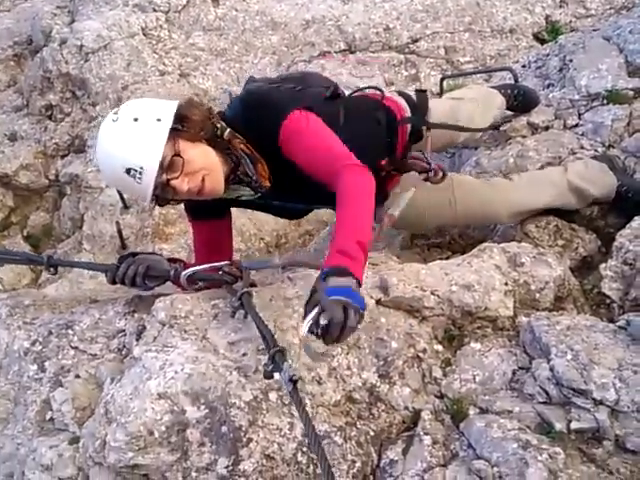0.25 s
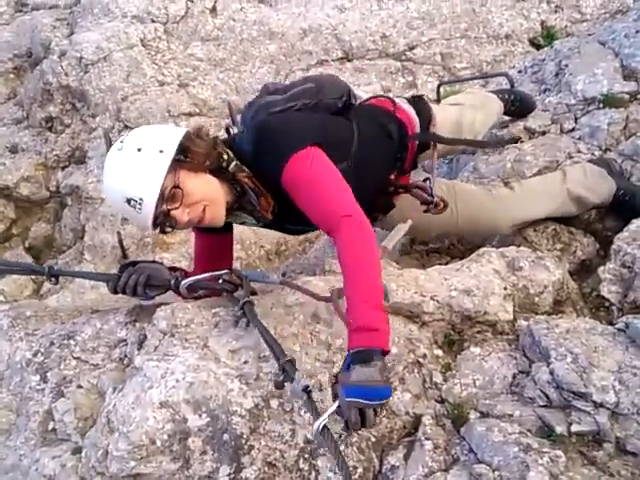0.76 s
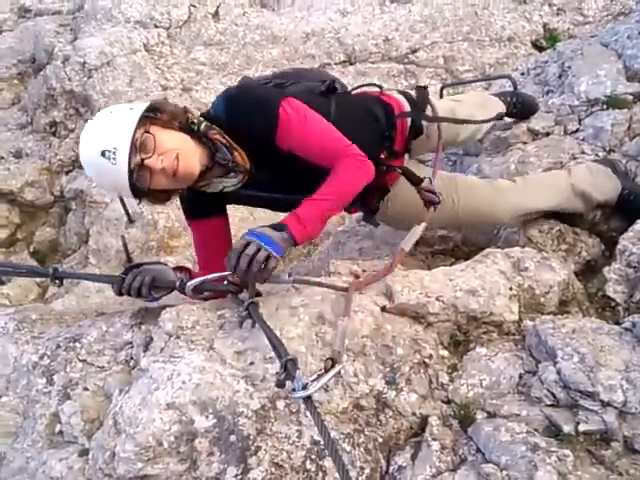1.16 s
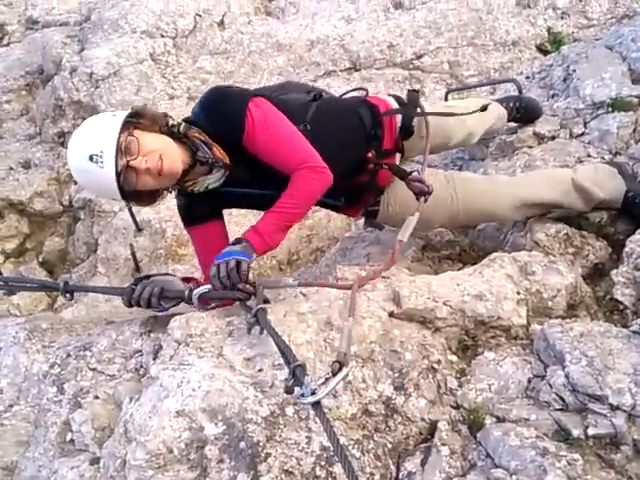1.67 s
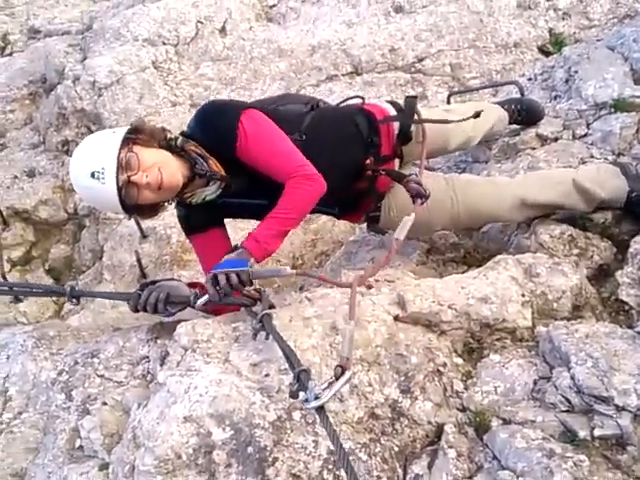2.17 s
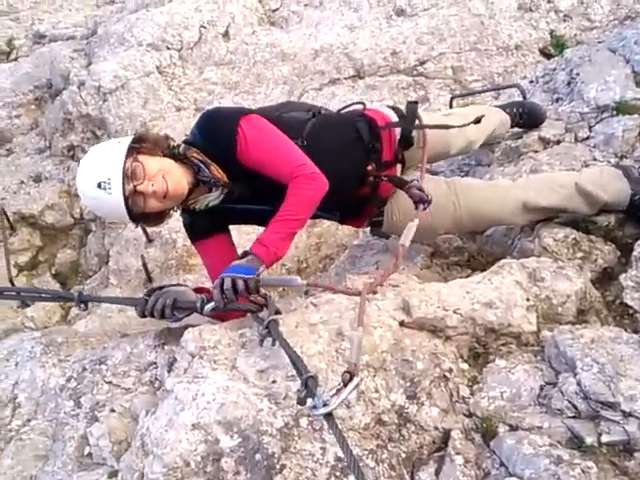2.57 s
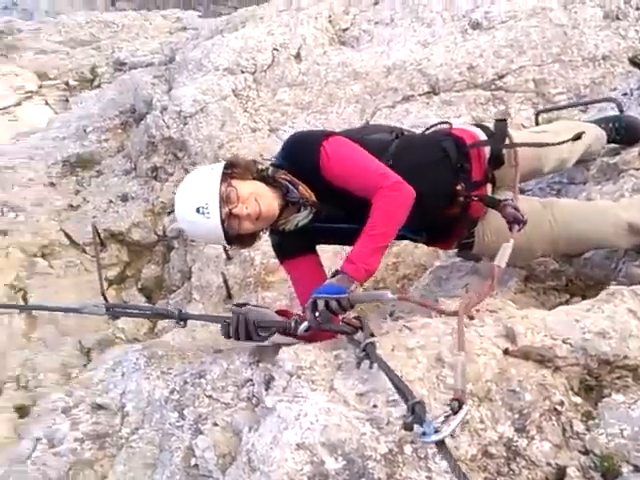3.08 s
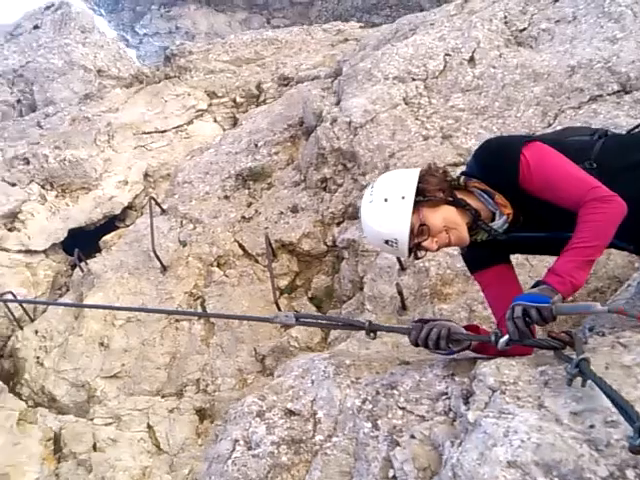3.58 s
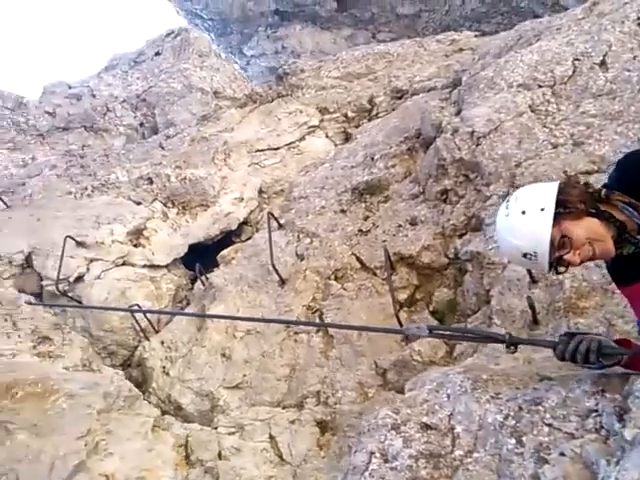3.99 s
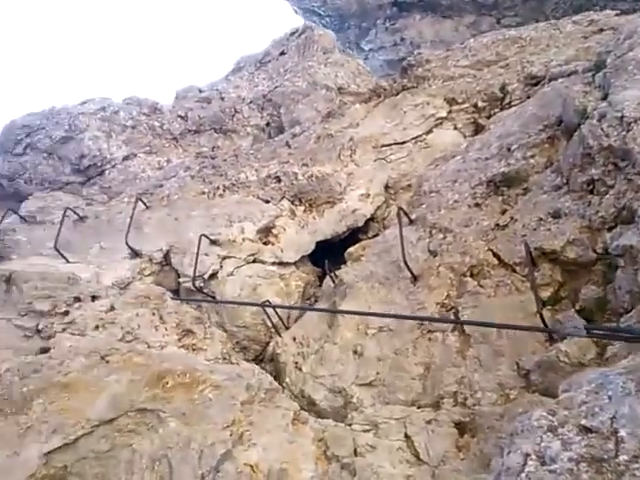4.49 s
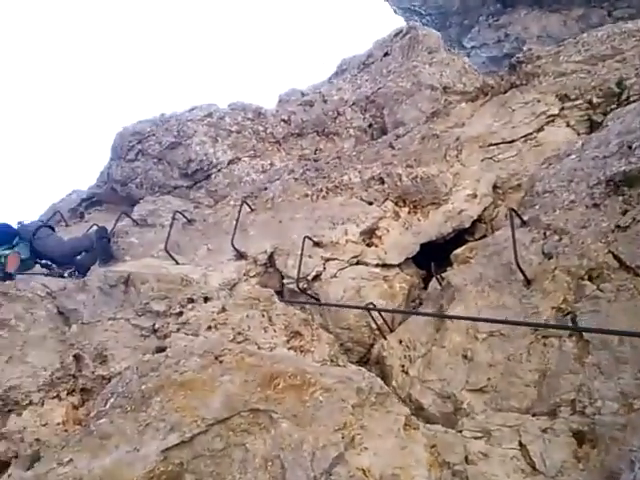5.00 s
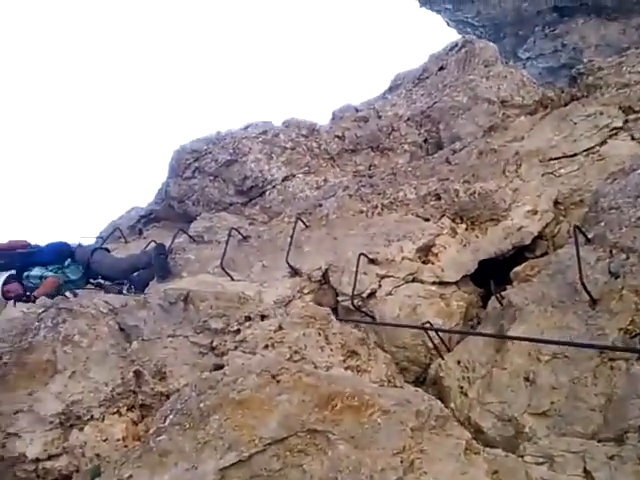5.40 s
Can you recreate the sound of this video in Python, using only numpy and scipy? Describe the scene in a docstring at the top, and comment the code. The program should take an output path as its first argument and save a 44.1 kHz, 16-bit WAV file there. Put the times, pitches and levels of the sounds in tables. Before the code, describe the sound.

Outdoors on a rock face, close stereo microphone: a rapid run of bright carabiner knocks, a short lull, then very loud, slightly clipped snaps on a steel cable around one second. Lighter clinks and ticks follow irregularly amid webbing and glove scrapes, with soft low bumps. Near five seconds a tight burst of clacks includes a brief metallic sliding hum, then only small ticks over faint breeze and hiss.

```python
"""Carabiners and lanyards knock a steel cable on a rock face: a rapid run of knocks opens,
the loudest come at 0.8-1.05 s, sparser ones follow, then a burst near 5 s with a brief metallic song.
A knock is a chatter of contacts that cracks and rings modes, with scattered returns off the rock.
Webbing and gloves scrape in noisy strokes and soft bumps thud now and then, over a faint breeze and air.
The input clips what exceeds its range."""
import sys
import numpy as np
from scipy import signal
from scipy.fft import rfft, irfft
from scipy.io import wavfile
from scipy.ndimage import uniform_filter1d

SR = 44100
rng = np.random.default_rng(int(sys.argv[2]) if len(sys.argv) > 2 else 0)


def generate_wav(sig):
    """Save sig (samples, or channels by samples) to the path in sys.argv[1] as 16-bit PCM at SR."""
    pcm = np.round(np.clip(np.atleast_2d(sig).T, -1, 1) * 32767).astype(np.int16)
    wavfile.write(sys.argv[1], SR, pcm)


N = 248710


def amp(db):
    """Decibels to gain."""
    return 10 ** (np.asarray(db) / 20)


def evened(x):
    """Scales to rms 1."""
    return x / np.sqrt(np.mean(x ** 2) + 1e-20)


def smoothed(x, first, second):
    """Two moving averages, widths in samples."""
    return uniform_filter1d(uniform_filter1d(x, first), second)


def read(points, hz):
    """Reads a spectrum on a log-frequency axis."""
    f, value = np.transpose(points)
    return np.interp(np.log(hz + 1), np.log(f + 1), value)


def add(mix, s, sound):
    """Mixes a sound in at a time in seconds."""
    part = mix[:, round(s * SR):][:, :sound.shape[1]]
    part += sound[:, :part.shape[1]]


def coloured(x, points):
    """Shapes the spectrum of each channel and evens the level."""
    return evened(irfft(rfft(x) * amp(read(points, np.fft.rfftfreq(N, 1 / SR))), N))


def pair(pan_db):
    """Left and right gains, pan_db apart, with a constant sum."""
    gains = np.array([amp(pan_db / 2), amp(-pan_db / 2)])
    return gains * 2 / gains.sum(0)


def fuzzy(noise, hz, width):
    """Low-passed complex noise carried up to a pitch: a breathy resonance."""
    r = np.exp(-np.pi * width / SR)
    slow = signal.lfilter([1 - r], [1, -2 * r, r * r], noise)  # double pole: steep skirts
    phase = 2 * np.pi * np.cumsum(hz * np.ones(noise.shape[-1])) / SR
    return evened((slow * np.exp(1j * phase)).real)


def metal_ring(t, t60, best_hz):
    """Decaying modes of carabiner and cable; a hand on the metal damps most of them."""
    # modes: f/Hz, relative level/dB, t60 before hand damping/s
    modes = [(958, -12, 0.0347), (1392, -6.5, 0.039), (1660, -11, 0.052), (2004, -14, 0.033),
             (2345, -9.5, 0.045), (2950, -7, 0.018), (3670, -17, .06), (3837, -8.5, 0.036), (4430, 4, .05),
             (4270, -8.5, 0.076), (4850, 5.5, 0.094), (5425, 9, 0.056), (6270, -5, .05), (6300, -5.5, .1),
             (7620, -7, .05), (7130, 8, .07), (7800, -7, 0.044), (8520, 6.5, 0.039), (8884, 1, .055),
             (8810, -19, .045), (9140, 10.5, 0.02), (9640, 3.5, 0.14), (9320, -2.5, 0.24), (10160, 0, .06),
             (10600, 0, 0.015), (10610, -31.5, .045), (12450, -3.5, 0.023), (13500, -2.5, .07),
             (14370, 2, 0.17), (15040, 16, 0.15)]
    f, db, own_t60 = np.transpose(modes)[:, :, None]
    near = np.exp(-(np.log(f / best_hz) / .06) ** 2)
    # each blow lands elsewhere: new shares per channel; modes near best_hz ring louder and freer
    share = 0.29 * rng.standard_normal((len(f), 1)) + 1.4 * rng.standard_normal((2, len(f), 1)) + near
    rate = np.log(1000) * (1 / own_t60 + 2.7 * (1 - .5 * near) / t60)
    return (share * amp(db) * np.sin(2 * np.pi * f * t) * np.exp(-rate * t)).sum(1)


def knock(s, treble_db, thud_db, clack_db, tick_db, t60, pan_db, best_hz):
    """A sharp first contact and a short chatter crack and ring the metal."""
    # band centres of thud, clack, ring and tick: f/Hz
    band_hz = [150, 650, 1600, 4300, 8700, 13500, 16200]
    # share of the left-right level: f/Hz, share
    pan_share = [(1300, 0.13), (4300, 0.12), (8700, 1.2), (13500, 0.3)]
    # delay of the left channel: t/s, lag/ms
    left_lag = [(.3, .11), (.6, -.27), (2.3, -.18), (2.6, .09), (3.2, -.09), (3.7, .05), (4.5, .13)]
    rattle_db, ring_db = -5, -1.5  # relative to the crack
    cable_hz, cable_db = 1594, 5.5  # low clank of the cable
    size = 6144
    t, hz = np.arange(size) / SR, np.fft.rfftfreq(size, 1 / SR)
    band_db = [thud_db - 8.0, thud_db - 3, thud_db + 7, clack_db + 4.5, 0, tick_db, tick_db - 5.5]
    colour = list(zip(band_hz, band_db))

    noise = rng.standard_normal((4, size))
    chatter_s = 0.00066 + 0.00081 * amp(treble_db / 3)  # harder blows stay in contact longer
    contacts = noise[0] ** 3 * (t < chatter_s) * np.minimum(t / 0.00035, 1)
    contacts[8] += 6.0  # sharp first contact
    ring = rfft(metal_ring(t, t60, best_hz)) * rfft(contacts)

    # the crack drops fast once the contacts end and leaves a lower rattle
    lumps = amp(4.6 * evened(smoothed(noise[3], 50, 30)))
    rattle = lumps * amp(rattle_db - 60 * t / t60)
    fall = rattle + np.exp(-np.maximum(t - chatter_s, 0) / 0.0025)
    crack = rfft((noise[1] + 1.3 * noise[1:3]) * np.minimum(t / 0.00015, 1) * fall)
    both = crack / np.linalg.norm(crack) + amp(ring_db) * ring / np.linalg.norm(ring)

    # level the broad outline, then apply the blow's own colour
    both = both / np.sqrt(uniform_filter1d((abs(both) ** 2).mean(0), size=300))
    best_peak_db = 5.5 * np.exp(-(np.log((hz + 1) / best_hz) / 0.1) ** 2)
    clank_db = cable_db * np.exp(-(np.log((hz + 1) / cable_hz) / 0.052) ** 2)
    both = both * amp(read(colour, hz) + best_peak_db + clank_db)
    both[0] *= np.exp(-2j * np.pi * hz * np.interp(s, *np.transpose(left_lag)) / 1000)

    # treble_db sets the highest short-term rms of the treble band, before panning
    treble = irfft(both * (hz > 6500) * (hz < 11000), size)
    loudest = np.sqrt(uniform_filter1d((treble ** 2).mean(0), 88).max())
    panned = irfft(both * pair(pan_db * read(pan_share, hz)), size)
    heard = np.roll(panned, 44, axis=1)  # 1 ms of room in front for a leading left channel
    return amp(treble_db) * heard / loudest


def slide():
    """A carabiner slides along the cable: its modes hum roughly, as narrow noise bands."""
    # song level: t/s, below 1 kHz/dB, above/dB
    song_level = [(4.975, -81, -70), (5.006, -46, -58), (5.023, -66, -59.5), (5.035, -64, -48.5),
                  (5.063, -65, -51)]
    # song modes: f/Hz, width before the factor 1.7/Hz, relative level/dB
    song_modes = [(860, 64, -3.5), (1800, 41, -14), (3310, 74, -2.5), (4020, 50, -9), (4600, 150, -6.5),
                  (5350, 85, -18)]
    s, low_db, high_db = np.transpose(song_level)
    t = np.arange(s[0], s[-1], 1 / SR)
    out = np.zeros((2, len(t)))
    for hz, width, db in song_modes:
        a, b, c, d = rng.standard_normal((4, len(t)))
        level_db = np.interp(t, s, low_db if hz < 1000 else high_db)
        noise = a + 1j * b + .5 * np.array([c, d])
        out += amp(db + level_db) * fuzzy(noise, hz, width * 1.7)
    return s[0], out * signal.windows.tukey(len(t), .15)


def rock(x):
    """Scattered returns from the cliff, each band dying at its own speed."""
    # decay of the returns: f/Hz, t60/s
    rock_t60 = [(500, 0.038), (3000, 0.095), (9000, 0.072), (15000, 0.027)]
    size = 12000
    taps = rng.choice([-1., 1.], (2, size)) * (rng.random((2, size)) < .06) * (np.arange(size) > 120)
    hz, t, z = signal.stft(taps, SR, nperseg=128)
    tail = signal.istft(z * amp(-60 * t / read(rock_t60, hz)[:, None]), SR, nperseg=128)[1]
    return signal.oaconvolve(x, tail / np.linalg.norm(tail[0]), axes=1)[:, :N]


def strokes():
    """Strokes rise, sag and fade into a rustle: power-summed scuff, rasp, fizz levels and pan in dB."""
    # webbing and glove drags: end of rise t/s, length/s, scuff/dB, rasp/dB, fizz/dB, left-right/dB
    drags = [(0.0, 0.14, -59, -49.5, -46.5, -6), (0.238, 0.03, -54.5, -56, -56, 2),
             (0.164, 0.33, -64.5, -56, -60.5, 16), (0.745, 0.09, -65, -58, -52.5, -8),
             (0.869, 0.06, -57, -50, -54, 8), (.99, 0.075, -80, -55, -54, -1),
             (1.096, 0.31, -67, -59.5, -61.5, -2), (1.446, 0.35, -67, -56, -55.5, 0.5),
             (1.926, 0.13, -62.5, -56, -58, 6), (2.05, 0.31, -63.5, -56, -67, 20),
             (2.6, .15, -64, -60, -59, 1), (2.778, 0.078, -58, -51, -46, 3),
             (2.988, 0.41, -67.5, -61.5, -64.5, 10), (3.537, 0.29, -65.5, -61, -65.5, 6),
             (3.672, 0.031, -56, -67, -64, -3), (3.89, 0.12, -62, -50.5, -49.5, 0),
             (4.09, 0.11, -62.5, -56.5, -60, -2), (4.232, 0.15, -66, -59.5, -61.5, 2),
             (4.997, 0.13, -62, -58.5, -57, 27), (5.143, 0.12, -78, -65.5, -80, 13)]
    # faint rustle between strokes: scuff, rasp, fizz [dB]
    rest_db = [-71, -65.5, -67]
    rest_pan_db, rise_s, fall_s = 10, 0.016, 0.021
    sag = 0.27  # share of power lost from start to end
    t = np.arange(0, N, 64) / SR
    start, length, *levels_db, pan_db = np.transpose(drags)[:, :, None]
    rise = np.clip((t - start) / rise_s + 1, 0, 1) ** 2
    fall = np.exp(-np.maximum(t - start - length, 0) / fall_s)
    on = rise * fall * (1 - sag * np.clip((t - start) / length, 0, 1))
    power, rest = on * amp(2 * np.array(levels_db)), amp(2 * np.array(rest_db))
    total = power.sum(1) + rest[:, None]
    pan = ((power[1] * pan_db).sum(0) + rest[1] * rest_pan_db) / total[1]  # weighted by rasp power
    return t, *(10 * np.log10(total)), pan


def scrape():
    """Strands catch and slip: clumped grains over a fine hiss, in three colours."""
    # spectra of the three layers: f/Hz, relative level/dB
    scuff_colour = [(290, -30.5), (500, -5.5), (733, -6), (1570, -2), (1820, -12.5), (3000, -9),
                    (3900, -27.5), (6600, -120)]
    rasp_colour = [(1180, -45), (2000, -9.5), (2290, -3.5), (3160, 1), (3750, 0), (4950, 4.5), (5860, -3.5),
                   (7000, -10), (9100, -38), (15400, -120)]
    fizz_colour = [(3530, -27), (6000, -8.5), (7600, -3), (8460, -4), (9620, -4.5), (10200, -2.5),
                   (10400, -5), (12100, -17), (15100, -9.5), (16200, -26.5)]
    s, scuff_db, rasp_db, fizz_db, pan_db = strokes()
    t = np.arange(N) / SR
    clumps = evened(smoothed(rng.standard_normal(N), 500, 300))
    sizes = amp(4.5 * np.minimum(rng.exponential(1, N), 3.5))
    grains = sizes * (rng.random(N) < 1200 / SR) * rng.choice([-1, 1], N)  # about 1200 per second
    grain_shape = rng.standard_normal((2, 60)) * np.exp(-np.arange(60) / 12)
    grains = signal.oaconvolve(grains[None], grain_shape, axes=1)[:, :N]
    common = .5 * rng.standard_normal(N)
    hiss = np.array([np.roll(common, 3), common]) + 1.5 * rng.standard_normal((2, N))
    source = (hiss + 0.75 * evened(grains)) * amp(2.3 * clumps)
    # the rubbing keeps one high carabiner mode faintly humming
    out = amp(np.interp(t, s, fizz_db) - 8.5) * fuzzy(source * (1 + 0j), 9900, 160)
    layers = [(scuff_colour, scuff_db, .2), (rasp_colour, rasp_db, .45), (fizz_colour, fizz_db, 1)]
    for colour, db, share in layers:
        gains = pair(share * np.interp(t, s, pan_db))
        out = out + gains * amp(np.interp(t, s, db)) * coloured(source, colour)
    return out


def bump(level_db, pitch_hz, t60):
    """A soft low push: two sines and slow noise, nearly the same on both sides."""
    t = np.arange(6000) / SR
    overtone = .5 * np.sin(2 * np.pi * pitch_hz * 2.3 * t) * amp(-400 * t)
    push = np.sin(2 * np.pi * pitch_hz * t) + overtone
    push = push + .5 * evened(smoothed(rng.standard_normal(len(t)), 80, 60))
    return amp(level_db + 4.5 - 60 * t / t60) * np.minimum(t / .004, 1) * push * pair(1.5)[:, None]


def breeze():
    """Lumpy low-passed noise rumbles on each port; a narrow noise band moans in smooth swells."""
    # moans: start t/s, length/s, level/dB, target f/Hz (blended with the resting pitch)
    swells = [(0.203, 0.318, -65, 300), (0.873, .12, -63.5, 260), (1.607, .24, -65, 284.6),
              (2.312, .2, -68, 249.6), (2.539, .21, -61, 300.3), (3.45, .55, -66.5, 281.5),
              (4.139, .52, -62.5, 319.2)]
    rumble_db, rest_db, rest_hz = -69, -74.5, 258.7
    rumble_colour = [(15, -9), (30, -3.0), (160, -8.5), (260, -20.5), (600, -48.0)]  # f/Hz, level/dB
    t = np.arange(N) / SR
    start, length, db, hz = np.transpose(swells)[:, :, None]
    swell = amp(db) * np.sin(np.pi * np.clip((t - start) / length, 0, 1))
    rest = amp(rest_db)
    level = swell.sum(0) + rest
    moan_hz = ((swell * hz).sum(0) + rest * rest_hz) / level
    noise = rng.standard_normal((5, N))
    lumps = amp(2.5 * evened(smoothed(noise[4], 1500, 900)))
    rumble = coloured(lumps * (noise[:2] + 0.62 * noise[2]), rumble_colour)
    moan = fuzzy(noise[2] + 1j * noise[3] + 5.1 * noise[:2], moan_hz, 150)
    return amp(rumble_db) * rumble + level * moan


def air():
    """The still valley and the microphones' own hiss: partly correlated stereo noise."""
    # air spectrum: f/Hz, relative level/dB
    air_colour = [(12, -29.5), (20, -6.5), (199, -4.5), (545, -11), (610, -9.5), (1540, -17.5),
                  (1670, -8.5), (1980, -21.5), (3010, -22.5), (3870, -17.5), (5120, -17.5), (14900, -17.5),
                  (16200, -39.5)]
    # left-right correlation: f/Hz, coefficient
    likeness = [(60, 0.34), (240, 0.46), (950, 0.3), (3770, -0.59), (15000, -0.86)]
    air_db = -62
    a, b = rfft(rng.standard_normal((2, N)))
    same = read(likeness, np.fft.rfftfreq(N, 1 / SR))
    return amp(air_db) * coloured(irfft([a, same * a + np.sqrt(1 - same ** 2) * b], N), air_colour)


def scene():
    """Knocks and slide with their rock returns, bumps, scrapes, breeze and air."""
    # knocks: t/s, treble level/dB, thud/dB, clack/dB, tick/dB (these three before band offsets),
    # rattle t60/s, left-right before band share/dB, best-rung f/Hz
    blows = [(.014, -31.5, -37, -25, -33, 0.087, 3, 8900), (0.0376, -31.5, -25, -30, -31, 0.037, 0, 9000),
             (.0508, -31.5, -28, -36, -36, 0.039, 7, 8900), (0.06, -31.5, -23, -27, -31, 0.073, -6, 8750),
             (0.0792, -30, -29, -20, -26, .04, 1, 8790), (.0924, -36.5, -27, -25, -26, 0.1, 5, 9200),
             (.1128, -39, -18, -17, -26, .045, 0, 8700), (0.1297, -38, -23, -28, -32, 0.069, 8, 8900),
             (.224, -46.5, -20, -10, -7, .055, -3, 9900), (0.463, -54, -13, -9, -21, .058, 14, 8000),
             (0.497, -51, -7, -13, -5, 0.046, 13, 10000), (0.6888, -30.5, -9, 3, -12, 0.075, 24, 9560),
             (0.692, -40.5, 1.5, -6, -17, .07, -8, 1590), (0.7009, -48.5, 0, 8, -11, 0.1, 12, 2830),
             (0.708, -46, 7, 4, -11, 0.076, 9, 1600), (0.74, -59, -14, -4, -19, .045, -1, 4350),
             (.75, -51.5, -6, 9, -16, 0.09, -13, 5120), (.756, -39.5, -28, -5, -7, 0.093, 1, 8700),
             (0.8019, -7, -19, -27.5, -21, 0.043, 30, 9700), (0.8063, -9, -24, -11.5, -7, 0.044, 2, 8400),
             (0.8883, -34, -13, -8.5, -12, .05, 24, 4200), (0.9383, -53, -11, 2, -27, .05, 25, 4260),
             (.9624, -35, -11, 1, -16, 0.11, 6, 4460), (0.9691, -12.5, -20.5, -4, -12, 0.036, 9, 4680),
             (1.0178, -20, -17, -3, 0, 0.027, 22, 3900), (1.0203, -13.5, -22, -8, -4, 0.039, 10, 9900),
             (1.0433, -23, -26, -6, -3, 0.073, 17, 9600), (1.271, -49.5, -12, -7, -25, 0.063, -1, 5070),
             (1.458, -43.5, -28, -11, -16, 0.11, -7, 5060), (1.5663, -47, -28, -4, -20, 0.085, 1, 9840),
             (1.666, -34, -13.5, -5, -23, 0.04, 22, 5300), (1.7427, -53, 8.5, 5, -18, 0.066, -2, 3080),
             (1.765, -27.5, -14, 1.5, -12, .054, 20, 9600), (1.8532, -48.5, -12.5, -8, -14, 0.1, 22, 5000),
             (1.922, -55, -17, 0, -14, .05, 2, 4930), (1.944, -41.5, -12, -7, -12, .046, 18, 5490),
             (1.964, -45, -19, -4, -19.5, .05, 0, 5600), (1.976, -48, -15, 0, -21, 0.043, -8, 5400),
             (2.1092, -68, 24.5, -7, -1, 0.057, -1, 2940), (2.1409, -34, -15, -10.5, -19, 0.034, 19, 9660),
             (2.2093, -39.5, -18, -7, -27, 0.07, 11, 4960), (2.217, -38, -16, -3, -18, 0.068, 12, 8000),
             (2.2285, -46, -4, 9, -21, 0.065, 31, 4720), (2.282, -44, -39, 7.5, -11, 0.036, 26, 4950),
             (2.3241, -41, -6.5, 8.5, -5, 0.035, 28, 5240), (2.3927, -46, -8, 5.5, -10, 0.055, 30, 7770),
             (2.4453, -43.5, -17, -8, -10, 0.032, 17, 7300), (2.5567, -27, -28, -7, -11.5, 0.018, 12, 5370),
             (2.565, -46, -7.5, -3, -20, 0.074, 5, 2750), (2.753, -48, -22, -4, -7, 0.059, 9, 4900),
             (2.7857, -38, -17, -0.5, -3, .05, -12, 10110), (3.042, -50.5, -5, 0, -6, .12, 24, 4080),
             (3.0637, -47, -5, 3.5, -5, .054, 25, 9160), (3.1389, -38.5, -39, -8.5, -17, 0.036, 19, 8740),
             (3.1601, -74, 16, -15, -9, 0.051, -10, 1630), (3.2287, -54, -5, 5.5, -7, 0.086, 20, 2181),
             (3.5533, -47, 0.5, 1.5, -3.5, 0.023, 17, 3380), (3.666, -38.5, -4, -2, -2, .045, 16, 9120),
             (3.7218, -41, -16, 1, -2, 0.11, 26, 7540), (3.763, -27.5, -30, -18.5, -21, 0.02, 22, 8300),
             (3.7728, -35, -24, -10, -5, 0.097, 10, 8800), (3.8312, -45.5, -11, -4, -10, 0.13, -8, 10050),
             (3.84, -57.5, 2.5, 4, -10, 0.046, -3, 2900), (3.8906, -31.5, -16, -1.5, -1, 0.042, -12, 7800),
             (3.8984, -31.5, -21, -13, -13, 0.058, 1, 9300), (3.929, -40, -13, -7, -16, 0.097, 4, 5040),
             (3.9496, -43, -3, 9, -23, 0.084, 18, 6040), (4.0086, -45.5, -5.5, 3, -7, .064, 18, 5110),
             (4.083, -50, -30, -4, -15, .05, 0, 6000), (4.132, -48.5, -19, 5, -8, 0.065, -3, 5150),
             (4.219, -52, -9, 2.5, -23, 0.042, 15, 3900), (4.2932, -58, -16, -9, -19.5, .044, 8, 8000),
             (4.3279, -48, -17, 0, -27, 0.21, -17, 3230), (4.361, -45, -14, 0, -7, .05, -1, 5060),
             (4.535, -63.5, 11.5, 10.5, -16, .05, 2, 3420), (4.667, -56, -9, 5, -20, 0.043, 18, 3320),
             (4.6877, -58.5, 10.5, 4, -19, 0.044, 13, 890), (4.7261, -34.5, -7.5, -13, -24, 0.043, 4, 5440),
             (4.8515, -54, -14, 0.5, -8, .05, 19, 9700), (4.8857, -27, -17, -6.5, -11, 0.096, 13, 8000),
             (4.9048, -25.5, -18.5, -16, -6.5, 0.074, 8, 8100), (4.906, -36, -15, 9, -6.5, 0.09, 10, 3550),
             (4.9333, -31, -51, -5, -8, .063, 14, 9500), (4.9488, -27.5, -51, -4, -9, 0.037, 29, 10200),
             (4.9625, -37, -42, -23, -15, 0.091, 10, 9470),
             (5.0694, -12.5, -21.5, -9.5, -3, 0.075, 9.5, 8700),
             (5.0768, -26, -39, -0.5, 0, 0.11, -8, 8600), (5.267, -50, -21, 2, -8, .05, 4, 7270),
             (5.277, -46, -15, 4, -4, 0.053, 2, 7300), (5.285, -47.5, -18, 0, -9, .06, 3, 4260),
             (5.3418, -47.5, -41, -4, -20, 0.031, -10, 7050)]
    # glove and boot bumps felt through the camera body: t/s, level before +4.5 dB/dB, f/Hz, t60/s
    pushes = [(0.259, -40.5, 276, 0.023), (0.803, -45, 155, 0.072), (3.246, -45.5, 151, 0.083),
              (3.282, -44, 180, 0.08), (3.669, -52.5, 171, 0.11), (3.68, -52.5, 187, 0.076)]
    metal, bumps = np.zeros((2, 2, N))
    for row in blows:
        add(metal, row[0] - .0008, knock(*row))
    add(metal, *slide())
    for s, *row in pushes:
        add(bumps, s, bump(*row))
    return metal + amp(-17) * rock(metal) + bumps + scrape() + breeze() + air()


def record(dry):
    """The two ports colour differently, the input clips at 0.96, a low-pass ends the band."""
    # port difference: f/Hz, left-right/dB
    port_pan = [(100, 1), (1000, -4), (3000, -4.5), (6000, -7.5), (9000, 0.5), (12000, 0.5), (15000, -4)]
    edge_hz = 16250
    ports = pair(read(port_pan, np.fft.rfftfreq(N, 1 / SR)))
    heard = np.clip(irfft(rfft(dry) * ports, N), -.96, .96)
    lowpass = signal.firwin(511, edge_hz, window=("kaiser", 9), fs=SR)
    return signal.oaconvolve(heard, lowpass[None], "same")


dry = scene()
out = record(dry)
generate_wav(out)
```